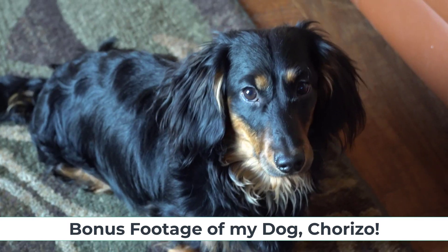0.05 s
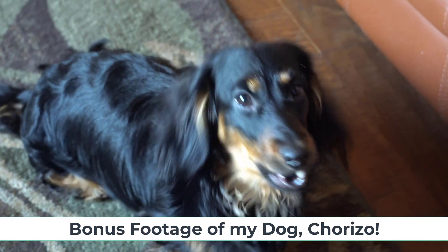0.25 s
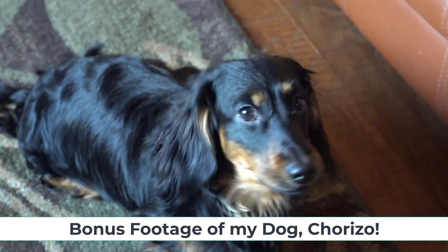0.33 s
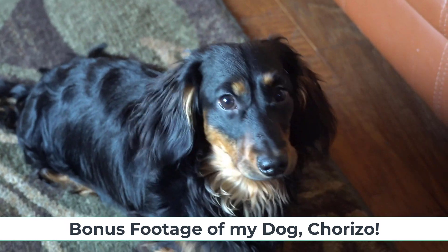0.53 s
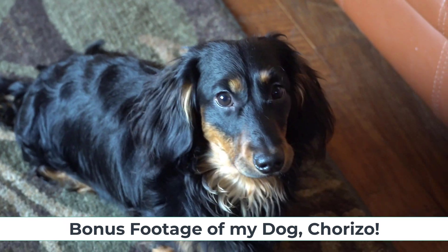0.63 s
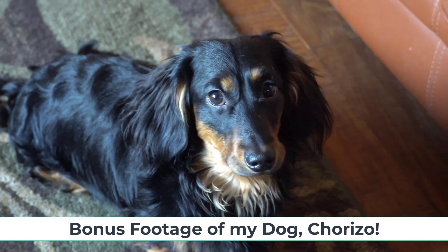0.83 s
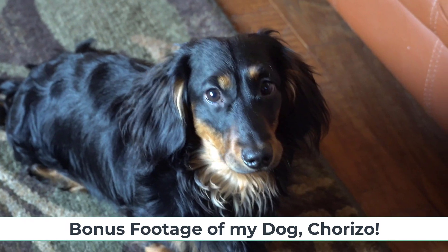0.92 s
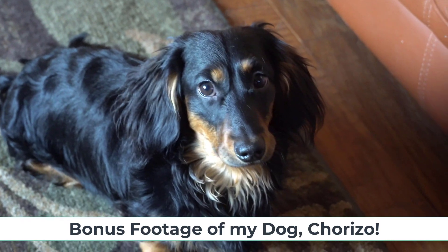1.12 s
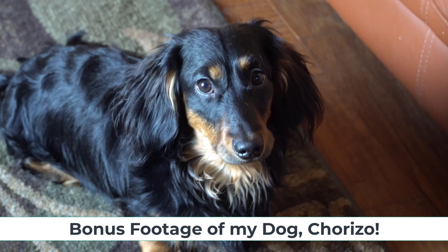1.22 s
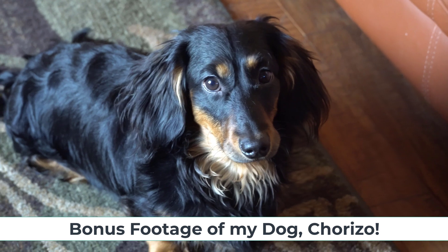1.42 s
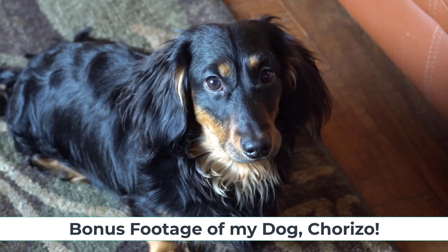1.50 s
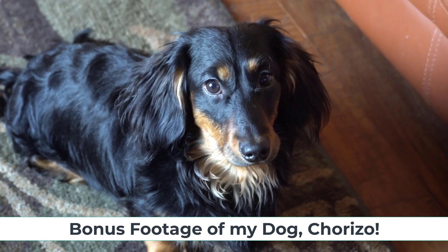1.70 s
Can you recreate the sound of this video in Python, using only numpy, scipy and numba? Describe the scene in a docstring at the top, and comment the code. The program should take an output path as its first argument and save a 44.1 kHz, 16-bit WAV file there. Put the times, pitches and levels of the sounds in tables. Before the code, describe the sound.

A small dog barks once, close by in a quiet room. At about 0.15 seconds a very brief low growl leaps into a loud, high, clear yelp with a slight breathy hiss, ending by 0.4 seconds. The room rings on at the same pitch, fading away by roughly 1.2 seconds. Only very faint room noise and a couple of barely audible soft thuds remain, until about 1.6 seconds.

```python
"""A small dog barks once, close by, in a quiet living room. Its vocal folds are the source and its mouth
the filter: a low growl leaps through a rough stretch of period doubling to a clear held yelp, which
sags as the mouth closes. Air hisses and whistles past the teeth. The room reverberates, its modes
ringing on at the held pitch, and a limiter flattens the peak. Faint ticks and soft thuds on the floor
sit in the room tone."""
import sys
import numpy as np
from scipy import signal
from scipy.fft import rfft, irfft
from scipy.io import wavfile
from numba import njit

SR = 44100
rng = np.random.default_rng(int(sys.argv[2]) if len(sys.argv) > 2 else 0)


def wav_out(sig):
    """Save sig, one row per channel (or a flat mono array), as 16-bit PCM at SR to the path in sys.argv[1]."""
    wavfile.write(sys.argv[1], SR, np.round(np.clip(np.atleast_2d(sig).T, -1, 1) * 32767).astype(np.int16))


N = 77175

# Fundamental of the vocal folds: time_s, pitch_hz
BARK_PITCH = [(.202, 359.8), (.212, 426.6), (.22, 521.2), (.229, 577.9), (.239, 621), (.249, 664),
              (.265, 709.3), (.281, 732.7), (.311, 734), (.325, 718), (.338, 686.7), (.36, 667.6)]
# Vocal effort: time_s, level_db, mouth_opening (0 to 1), subharmonic_db, rasp_db
BARK_EFFORT = [(.203, -34.5, 0.83, -4, -3.5), (.212, -20, 0.02, -9.5, -8), (.22, -19, 0.2, -1, -11),
               (.237, -14, 0.03, -4, -20), (.255, -8, .4, -10, -31), (.28, -3, 1, -25.5, -35),
               (.32, -4, 1, -26, -35.5), (.348, -4, 0.93, -30, -32), (.372, -20, 0.7, -26.5, -26)]
# Vocal tract response with the mouth shut, ajar and wide open: frequency_hz, gain_db
TRACT_SHUT = [(60, -33), (130, 2.5), (280, 5), (380, -6), (520, -9.5), (820, -5.5), (1080, -24.5),
              (1230, -19), (1700, -38), (2800, -31), (3700, -46.5), (12000, -60)]
TRACT_AJAR = [(40, -27.5), (150, -28.5), (290, -21), (400, -2), (620, 4), (830, 2.5), (1150, -19),
              (1380, -13.5), (1800, -12), (2050, -15), (2380, -7), (2650, -24.5), (3000, -17), (3800, -41),
              (4500, -37), (6200, -48), (7600, -30.5), (9500, -40.5), (15000, -62)]
TRACT_WIDE = [(150, -25), (400, -20.5), (620, -0.5), (760, -1), (1080, -6), (1330, -10.5), (1480, -14),
              (1800, -13.5), (2100, -14.5), (2900, -18.5), (3350, -38), (3680, -24), (4000, -29),
              (4600, -31), (5300, -51), (6800, -55), (8200, -44.5), (9700, -44.5), (11000, -62.5),
              (15500, -73.5)]
# Envelope of the air hissing past the teeth: time_s, level_db
HISS_ENVELOPE = [(.135, -81), (.16, -64), (.185, -51), (.212, -54), (.23, -41), (.255, -41.5), (.29, -48),
                 (.335, -45), (.37, -69.5)]
# Spectrum of that hiss: frequency_hz, gain_db
HISS_SPECTRUM = [(2000, -28.5), (3700, -18), (4500, -6), (5400, -18), (6600, -14), (7500, 0), (8600, -5),
                 (9500, -2.5), (11000, -14.5), (13000, -26), (15500, -30)]
# Envelope of the growl behind closed lips: time_s, level_db
GROWL_ENVELOPE = [(.128, -75.5), (.148, -48), (.16, -38.5), (.178, -35), (.195, -28), (.208, -31.5),
                  (.225, -61)]
# Whistles between the teeth: centre_s, half_length_s, pitch_hz, bandwidth_hz, level_db
WHISTLES = [(.209, .008, 4600, 150, -38.5), (0.22, 0.0044, 7500, 150, -41), (.33, 0.06, 6250, 90, -48)]
# Reverberation time of the room: frequency_hz, t60_s
REVERB_T60 = [(120, 0.13), (350, .5), (730, 0.6689), (1450, 0.6654), (2200, 0.6059), (4000, 0.51),
              (8000, 0.34), (14000, 0.2649)]
# Spectrum of the reflections: frequency_hz, gain_db
REVERB_SPECTRUM = [(100, -28), (250, -17.5), (400, -7.5), (550, -12.5), (660, -5), (735, -3.5), (850, -8),
                   (1400, 1.5), (2200, -0.5), (3000, -4.5), (3600, -6), (4500, -0.5), (8000, -1),
                   (14000, -15)]
# Room modes near the yelp's first three harmonics: frequency_hz, resonant_gain_db, t60_s
ROOM_MODES = [(729.3, -12, 1.02), (1459, -13.5, 1.2), (2196, -10, 0.81)]
# Faint ticks: start_s, level_db
TICKS = [(.022, -51), (1.386, -65)]
# Spectrum of a tick: frequency_hz, gain_db
TICK_SPECTRUM = [(150, -14.5), (500, -3), (850, 2), (1400, -16.5), (4000, -28), (14000, -34)]
# Soft thuds on the floor: start_s, level_db
THUDS = [(0.951, -60.5), (1.527, -60.5)]
# Spectrum of the room's steady noise: frequency_hz, gain_db
ROOM_TONE_SPECTRUM = [(15, -32.5), (25, -5.5), (69, -8), (103, -3), (135, -9), (191, -5), (450, -14.5),
                      (604, -10), (749, -16.5), (811, -9.5), (903, -19.5), (1350, -24.5), (15000, -34)]

FLUTTER, JITTER, SHIMMER, ROUGHNESS_HZ = .0021, .12, 1, 286
SUBHARMONIC_WAVER, PUFF_DEPTH, BREATH_GAIN_DB, FADE_DB_PER_S = .43, .2, 16, 1200.5
GROWL_HZ, GROWL_JITTER, GROWL_RASP_DB = 171.56, .15, -1.5
REVERB_GAIN_DB, REVERB_DELAY_S, REVERB_BUILD_S = -7.5, .0027, .014
TICK_DECAY_S = .0079
THUD_HZ, THUD_RISE_S = 98.8, .016
ROOM_TONE_DB, HUM_HZ, HUM_DB, HUM_WAVER = -69, 102, -79, .62
LIMIT_DB, LIMIT_ATTACK_S, LIMIT_RELEASE_S, LOWPASS_HZ = -7.5, .00015, .032, 15200


def bark(t):
    """Source and filter: pulsing vocal folds and puffs of air excite the resonances of the mouth."""
    level = undb(curve(BARK_EFFORT, t)) * edge_fade(BARK_EFFORT, t)
    opening = curve(BARK_EFFORT, t, column=2)
    doubling = undb(curve(BARK_EFFORT, t, column=3))
    rasp = undb(curve(BARK_EFFORT, t, column=4))
    pitch_hz = curve(BARK_PITCH, t) * (1 + (FLUTTER + JITTER * rasp) * wobble(ROUGHNESS_HZ))
    phase = 2 * np.pi * np.cumsum(pitch_hz) / SR
    folds = vocal_folds(phase, doubling)
    puffs = 1 + PUFF_DEPTH * (doubling * np.cos(phase / 2) + (1 - doubling) * np.cos(phase))
    breath = undb(BREATH_GAIN_DB) * rasp * puffs * rng.standard_normal(N)
    shimmer = 1 + SHIMMER * rasp * wobble(ROUGHNESS_HZ)
    source = level * (folds * shimmer + breath)
    voice = colour(source * (1 - opening), TRACT_AJAR) + colour(source * opening, TRACT_WIDE)
    return voice + teeth_hiss(t, puffs)


def vocal_folds(phase, doubling):
    """Period doubling: alternately strong and weak cycles add odd multiples of half the pitch."""
    subharmonic = doubling * (1 + SUBHARMONIC_WAVER * wobble(120))
    return sum((subharmonic if k % 2 else 1) * np.cos(k * phase / 2) for k in range(1, 45))


def growl(t):
    """Damped radiation: the closed mouth muffles the rasp that pulses with a low, unsteady tone."""
    pitch_hz = GROWL_HZ * (1 + GROWL_JITTER * wobble(110))
    folds = np.sin(2 * np.pi * np.cumsum(pitch_hz) / SR)
    rasp = (1 + .5 * folds) * noise(TRACT_SHUT)
    sounding = (t > GROWL_ENVELOPE[0][0]) & (t < GROWL_ENVELOPE[-1][0])
    return sounding * undb(curve(GROWL_ENVELOPE, t)) * (folds + undb(GROWL_RASP_DB) * rasp)


def teeth_hiss(t, puffs):
    """Turbulence: air rushing past the teeth makes noise, modulated by the puffs from the folds."""
    level = undb(curve(HISS_ENVELOPE, t)) * edge_fade(HISS_ENVELOPE, t)
    return level * puffs * noise(HISS_SPECTRUM)


def whistles(t):
    """Narrowband noise: air between the teeth takes on a pitch, swelling and fading as the jaw moves."""
    out = np.zeros(N)
    for centre_s, half_length_s, pitch_hz, bandwidth_hz, level_db in WHISTLES:
        phase = 2 * np.pi * pitch_hz * t
        tone = wobble(bandwidth_hz / 2) * np.cos(phase) + wobble(bandwidth_hz / 2) * np.sin(phase)
        out += undb(level_db) * np.exp(-((t - centre_s) / half_length_s) ** 2) * tone
    return out


def reverberation(direct, t):
    """Exponential decay: reflections die soonest in bass and treble; lightly damped modes ring on."""
    build = np.clip((t - REVERB_DELAY_S) / REVERB_BUILD_S, 0, 1)
    diffuse = build * sum(band * np.exp(-np.log(1000) * t / at_hz(REVERB_T60, hz))
                          for hz, band in bands(rng.standard_normal(N)))
    diffuse /= np.sqrt(np.sum(diffuse ** 2))
    response = undb(REVERB_GAIN_DB) * colour(diffuse, REVERB_SPECTRUM)
    for hz, gain_db, t60_s in ROOM_MODES:
        damping = np.log(1000) / t60_s
        mode = np.exp(-damping * t) * np.cos(2 * np.pi * hz * t)
        response += undb(gain_db) * 2 * damping / SR * mode
    return signal.fftconvolve(direct, response)[:N]


def ticks(t):
    """Transients: noise bursts with a fast exponential decay are heard as tiny dull clicks."""
    envelope = sum(undb(level_db) * (t > start_s) * np.exp(-np.abs(t - start_s) / TICK_DECAY_S)
                   for start_s, level_db in TICKS)
    return envelope * noise(TICK_SPECTRUM)


def thuds(t):
    """Resonance: soft bumps swell and fade in one low mode of the floor."""
    out = np.zeros(N)
    for start_s, level_db in THUDS:
        age_s = np.maximum(t - start_s, 0)
        envelope = age_s / THUD_RISE_S * np.exp(1 - age_s / THUD_RISE_S)
        out += undb(level_db) * envelope * np.sin(2 * np.pi * THUD_HZ * age_s)
    return out


def room_tone(t):
    """Noise floor: a low, steady rush with a faint amplitude-modulated hum."""
    hum = (1 + HUM_WAVER * wobble(4.6)) * np.sin(2 * np.pi * HUM_HZ * t)
    return undb(ROOM_TONE_DB) * noise(ROOM_TONE_SPECTRUM) + undb(HUM_DB) * hum


def undb(db):
    """Decibels to amplitude ratio."""
    return 10 ** (np.asarray(db) / 20)


def unit_rms(x):
    """Normalisation to rms 1."""
    return x / np.sqrt(np.mean(x ** 2))


def curve(table, t, column=1):
    """Linear interpolation of one column of a time table."""
    rows = np.array(table)
    return np.interp(t, rows[:, 0], rows[:, column])


def edge_fade(table, t):
    """Exponential fade outside the time span of a table."""
    outside_s = np.maximum(t - table[-1][0], 0) + np.maximum(table[0][0] - t, 0)
    return undb(-FADE_DB_PER_S * outside_s)


def at_hz(table, hz):
    """Interpolation on a log-frequency axis."""
    rows = np.array(table)
    return np.interp(np.log(np.maximum(hz, 1)), np.log(rows[:, 0]), rows[:, 1])


def colour(x, spectrum):
    """Minimum-phase filtering: folding the cepstrum makes the response causal."""
    gain = undb(at_hz(spectrum, np.arange(N + 1) * SR / (2 * N)))
    cepstrum = irfft(np.log(gain))
    cepstrum[1:N] *= 2
    cepstrum[N + 1:] = 0
    return irfft(rfft(x, 2 * N) * np.exp(rfft(cepstrum)))[:N]


def noise(spectrum):
    """Filtered white noise of rms 1."""
    return unit_rms(colour(rng.standard_normal(N), spectrum))


def bands(x, count=20):
    """Complementary filter bank: (centre_hz, band) pairs whose bands sum to the input."""
    centres_hz = np.geomspace(60, 16000, count)
    spectrum = rfft(x)
    log_hz = np.log(np.maximum(np.fft.rfftfreq(N, 1 / SR), 1))
    return [(hz, irfft(spectrum * np.interp(log_hz, np.log(centres_hz), weights), N))
            for hz, weights in zip(centres_hz, np.eye(count))]


def wobble(rate_hz):
    """Random modulation: low-passed noise of rms 1."""
    lowpass = signal.butter(2, rate_hz, fs=SR, output="sos")
    return unit_rms(signal.sosfilt(lowpass, rng.standard_normal(N)))


@njit
def follow_peak(x, attack_s, release_s):
    """Envelope detection: one-pole smoothing with separate rise and fall times."""
    attack, release = 1 - np.exp(-1 / (attack_s * SR)), 1 - np.exp(-1 / (release_s * SR))
    out, envelope = np.empty(len(x)), 0.
    for i in range(len(x)):
        envelope += (x[i] - envelope) * (attack if x[i] > envelope else release)
        out[i] = envelope
    return out


def scene():
    """Superposition: direct sound, its reverberation and the background add in one channel."""
    t = np.arange(N) / SR
    direct = growl(t) + bark(t) + whistles(t) + ticks(t)
    return (direct + reverberation(direct, t) + thuds(t) + room_tone(t))[None]


def record(dry):
    """Limiting: the gain falls while the bark exceeds a threshold; a low-pass then cuts the top."""
    peak = follow_peak(np.abs(dry[0]), LIMIT_ATTACK_S, LIMIT_RELEASE_S)
    limited = dry / np.maximum(peak / undb(LIMIT_DB), 1)
    return signal.sosfilt(signal.ellip(8, .2, 70, LOWPASS_HZ, fs=SR, output="sos"), limited)


dry = scene()
out = record(dry)
wav_out(out)
```